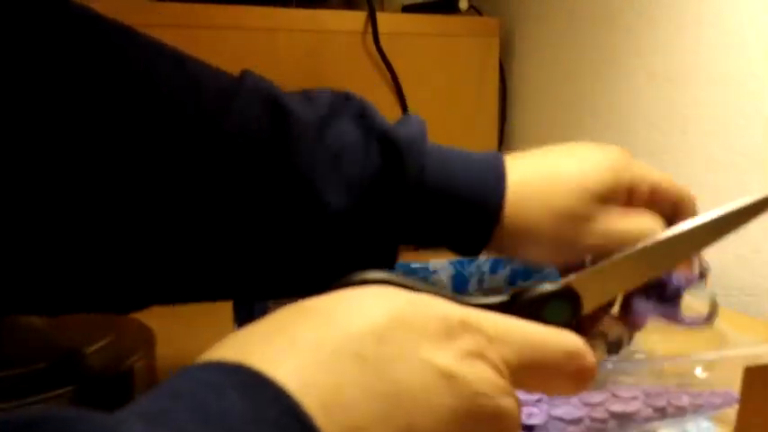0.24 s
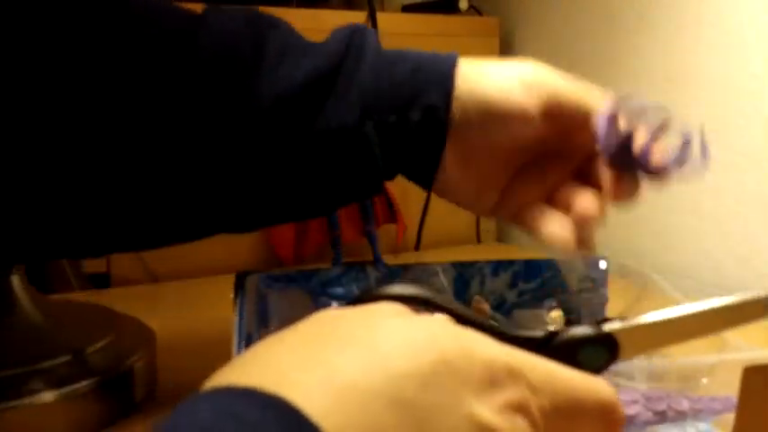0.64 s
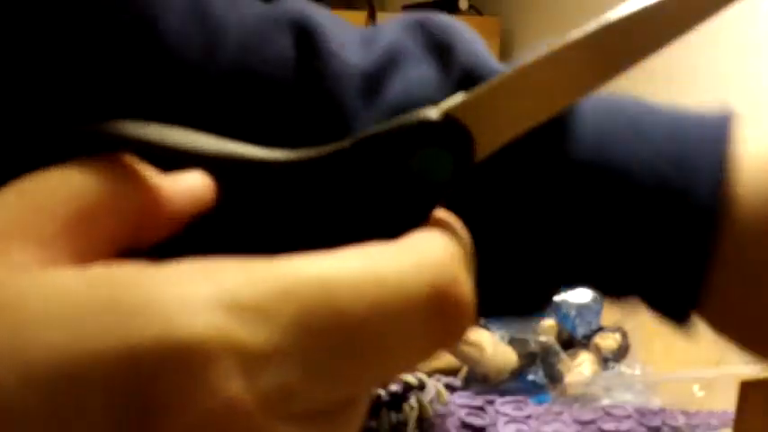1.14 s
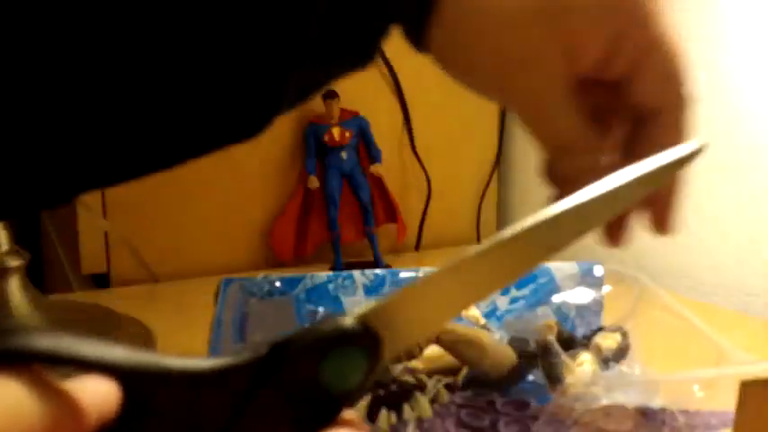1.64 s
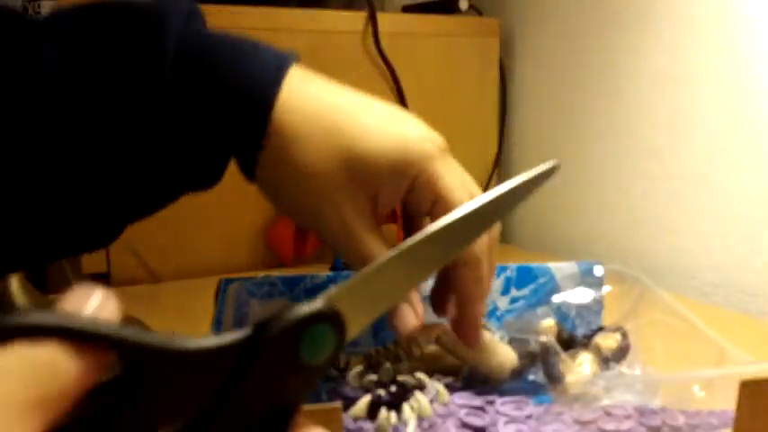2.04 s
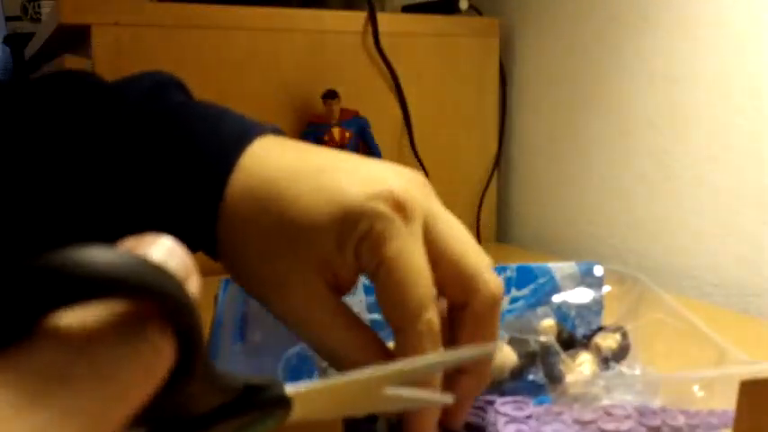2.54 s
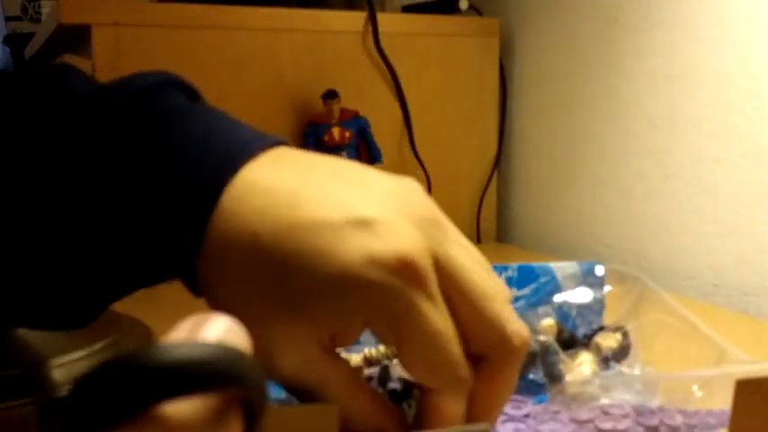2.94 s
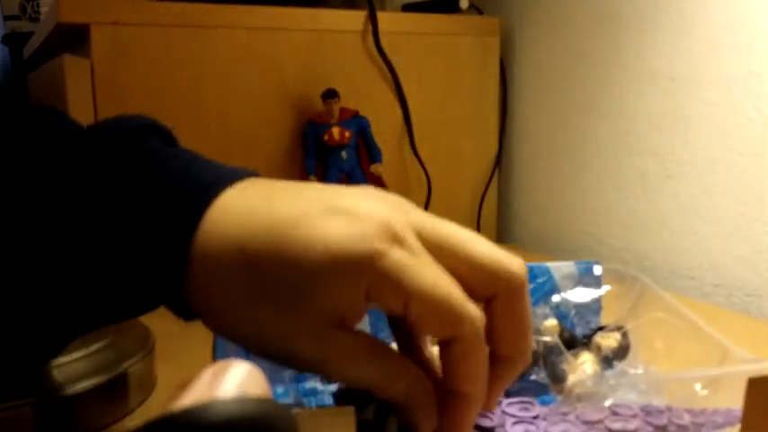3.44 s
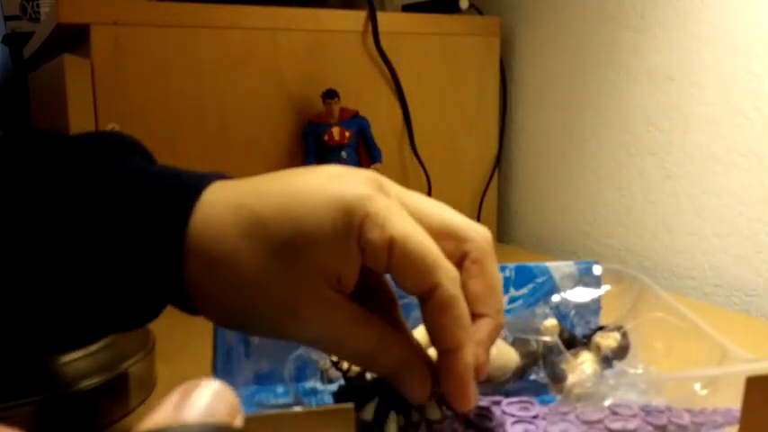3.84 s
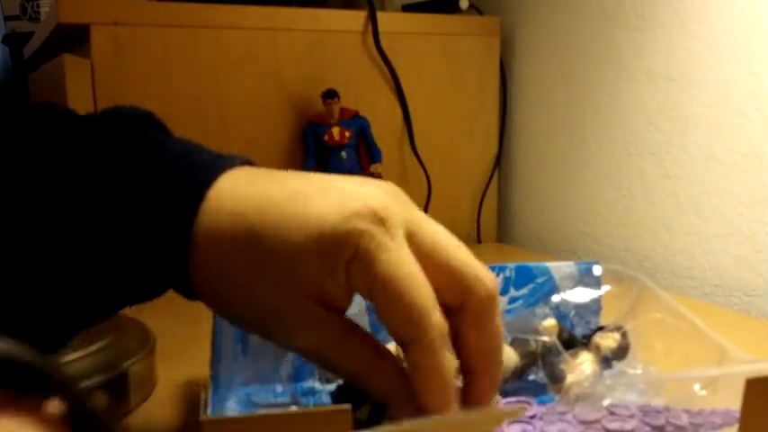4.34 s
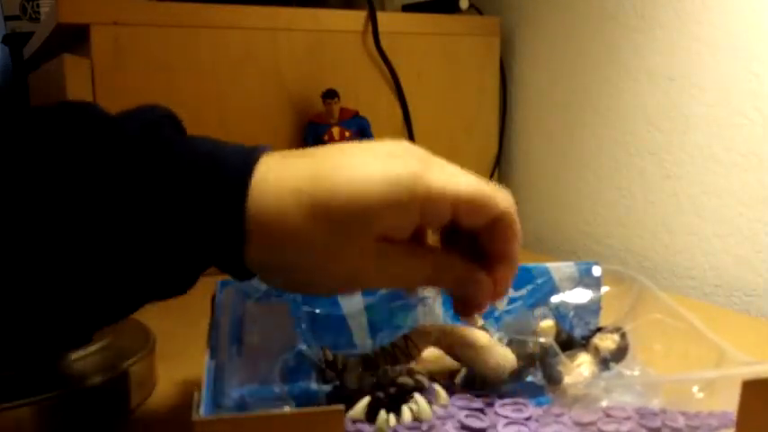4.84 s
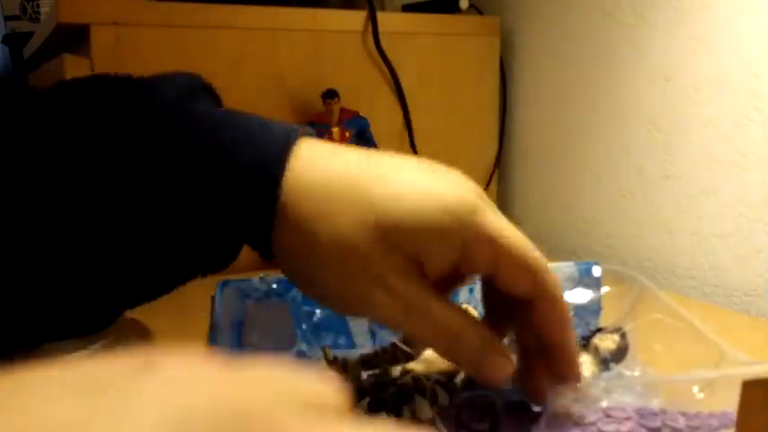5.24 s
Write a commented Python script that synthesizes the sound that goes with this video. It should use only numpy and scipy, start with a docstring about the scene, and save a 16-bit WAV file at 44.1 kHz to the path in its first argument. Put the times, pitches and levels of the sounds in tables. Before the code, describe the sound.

Close, sharp snaps and crinkles of plastic packaging being pried apart, with desk thumps and scissors sliding open, then laid down.

```python
"""Hard plastic parts are pried from a thin blister tray on a wooden desk, close up in a small quiet room.
First second: the film buckles and scrapes, parts snap and ring, tray and desk knock.
Sparser knocks and faint edge squeaks follow; at 2.2 s scissor blades slide open, steel on steel.
The prying goes on, with loud snaps at 4.0 and 4.8 s; from 4.8 s the scissors are laid down and rock.
Room tone and hiss run throughout; the microphone port rings near 9 kHz."""
import sys
import numpy as np
from scipy import signal
from scipy.fft import rfft, irfft, next_fast_len
from scipy.io import wavfile

SR = 44100
rng = np.random.default_rng(int(sys.argv[2]) if len(sys.argv) > 2 else 0)


def to_wav(sig):
    """Store sig (one row per channel, or 1-D mono) as 16-bit WAV at the path in sys.argv[1].

    Samples outside -1..1 are clipped; the rate is SR.
    """
    pcm = np.clip(np.atleast_2d(sig), -1, 1) * 32767
    pcm = np.round(pcm).astype(np.int16)
    wavfile.write(sys.argv[1], SR, pcm.T)  # frames by channels


N = 242991

# film handling curve: (time [s], crackle [dB], tray rattle [dB])
HANDLING = [(0.0, -42, -44.5), (0.12, -34, -46), (0.29, -56, -46.5), (0.46, -34.5, -59), (0.61, -58, -44.5),
            (0.81, -54, -66), (0.98, -76, -78.5), (1.29, -63.5, -77.5), (1.52, -68, -66), (2.3, -74.5, -76),
            (3.19, -65, -68.5), (3.79, -76, -72), (4.07, -67.5, -85), (4.22, -69, -88), (4.56, -67, -73),
            (4.88, -47.5, -61), (5.29, -63.5, -59.5), (5.51, -49.5, -68)]
# contacts: (time [s], snap [dB], part [dB], tray [dB], part spot [Hz], pocket [Hz], chatter t60 [s])
CONTACTS = [(0.0503, -23.5, -35.5, -30, 1920, 947, 0.06), (0.0661, -14, -20, -21.5, 2950, 1280, 0.077),
            (0.1146, -15, -36, -24.5, 1840, 751, 0.067), (0.1246, -10.5, -19.5, -20, 3500, 735, 0.06),
            (0.1776, -20.5, -32, -39, 1750, 1020, 0.05), (0.2009, -16.5, -35, -35, 1780, 751, 0.032),
            (0.2597, -3, -15, -50, 2030, 931, 0.049), (0.2654, 0, -10.5, -26, 3900, 735, 0.054),
            (0.2864, -6.5, -24, -51, 3070, 450, 0.06), (0.2944, -4.5, -33, -23, 3770, 1050, 0.076),
            (0.2998, -2, -22, -19, 3350, 764, 0.092), (0.3104, 0, -6.5, -21, 2040, 1300, 0.096),
            (0.393, -3.5, -21.5, -22.5, 4170, 710, 0.06), (0.4372, -5.5, -22.5, -8.5, 2070, 910, 0.036),
            (0.4467, -8, -17, -29, 2150, 1010, 0.06), (0.4694, -11, -20, -22.5, 1730, 950, 0.04),
            (0.4983, -18.5, -25, -21, 1860, 880, 0.047), (0.5575, -14, -25, -18.5, 1860, 790, 0.075),
            (0.6636, -13.5, -29.5, -37, 1740, 729, 0.075), (0.7123, -22.5, -40.5, -44, 3600, 1050, 0.083),
            (0.764, -26, -44, -51, 3620, 436, 0.044), (0.8081, -16, -30, -29.5, 2790, 479, 0.066),
            (0.9348, -28.5, -18, -28, 2990, 1130, 0.043), (0.9562, -16, -19.5, -30, 1913, 498, 0.022),
            (1.32, -27, -15, -22.5, 1800, 945, 0.048), (1.513, -50, -45, -38.5, 1850, 380, 0.057),
            (1.5281, -40, -49, -40.5, 1890, 383, 0.042), (1.5473, -29, -36.5, -28, 1640, 418, 0.073),
            (1.6031, -28, -43, -37.5, 1640, 423, 0.052), (1.7675, -23, -44, -46, 3780, 419, 0.06),
            (1.8433, -51, -49.5, -43, 1736, 422, 0.06), (1.8872, -46, -43.5, -42, 1755, 382, 0.063),
            (2.0108, -53.5, -68, -50.5, 1788, 428, 0.0615), (2.0562, -53.5, -61, -47, 1637, 423, 0.096),
            (2.1875, -33.5, -45, -35, 1810, 423, 0.06), (2.4892, -46, -61, -60, 1973, 425, 0.059),
            (2.528, -32, -50.5, -44.5, 1730, 474, 0.08), (2.589, -34, -58, -49.5, 2200, 1130, 0.091),
            (2.6887, -29, -42.5, -37, 1960, 937, 0.17), (2.8155, -34.5, -48, -43, 1800, 484, 0.025),
            (2.9205, -29.5, -42.5, -37.5, 1960, 1070, 0.18), (2.963, -22.5, -36.5, -33, 2870, 724, 0.11),
            (3.035, -40, -47, -39.5, 3120, 1090, 0.042), (3.053, -25.5, -39.5, -39, 2870, 1100, 0.16),
            (3.0964, -34, -36, -34.5, 1590, 1140, 0.14), (3.1111, -14, -28.5, -21.5, 1730, 1036, 0.074),
            (3.1803, -35.5, -46, -39.5, 1740, 587, 0.042), (3.22, -40, -48, -67, 2840, 474, 0.023),
            (3.3244, -41, -40, -33, 1800, 408, 0.046), (3.3687, -31.5, -48, -51.5, 2890, 654, 0.038),
            (3.3779, -25, -40.5, -39, 1920, 937, 0.065), (3.451, -17.5, -28.5, -25, 2865, 990, 0.055),
            (3.4696, -21, -35, -34, 1590, 840, 0.076), (3.5431, -40, -43, -36, 1920, 483, 0.054),
            (3.8254, -36, -53, -47.5, 2750, 466, 0.071), (3.8502, -23.5, -48, -36, 2130, 401, 0.029),
            (3.926, -28.5, -41, -49, 2910, 1140, 0.031), (3.9989, 0, -19.5, -19.5, 3000, 1080, 0.076),
            (4.0113, -11, -29.5, -25, 2405, 1050, 0.06), (4.0284, -16.5, -36, -32, 1960, 441, 0.16),
            (4.0627, -17.5, -42, -55, 2910, 463, 0.06), (4.0738, -19.5, -42, -56, 3150, 1000, 0.07),
            (4.2018, -23.5, -31.5, -30.5, 2880, 465, 0.088), (4.4477, -17.5, -35, -34, 1956, 600, 0.052),
            (4.6157, -21.5, -40.5, -44, 2830, 1130, 0.06), (4.6275, -23.5, -39.5, -30.5, 2090, 1020, 0.055),
            (4.7202, -24.5, -41, -41, 3540, 463, 0.055), (4.7329, -29, -43.5, -41.5, 1700, 460, 0.066),
            (4.7495, -20, -30, -27, 2750, 1020, 0.096), (4.775, -2.5, -18.5, -24, 3120, 527, 0.13),
            (4.785, -15, -36, -28, 1820, 460, 0.035), (4.8991, -24, -36.5, -65, 4070, 1230, 0.043),
            (4.9194, -23, -19.5, -19, 2500, 1060, 0.02), (5.0186, -43, -35, -24.5, 1850, 524, 0.065),
            (5.0774, -23.5, -38, -41, 1790, 1190, 0.066), (5.184, -18, -32.5, -31.5, 2050, 1140, 0.092),
            (5.2844, -19.5, -23, -30, 3430, 815, 0.06), (5.3206, -15.5, -46, -32, 3530, 470, 0.056),
            (5.3264, -25, -58, -48, 1930, 474, 0.06), (5.3701, -9, -19.5, -29, 1970, 1190, 0.055),
            (5.4055, -13.5, -36, -19.5, 1890, 1230, 0.066), (5.4136, -11.5, -26.5, -28, 1600, 570, 0.15),
            (5.4235, -20, -44, -21, 1940, 991, 0.032), (5.4307, -21, -31, -15, 1960, 466, 0.025),
            (5.5004, -20, -36, -39, 3790, 1070, 0.06)]
# glancing fingers and parts: (time [s], bright [dB], tray [dB])
GLANCES = [(0.0601, -12.5, -16), (0.0867, -15.5, -19), (.1605, -23.5, -23.5), (0.1919, -26, -26),
           (.6374, -36, -32.5), (.7324, -24.5, -32), (1.3048, -33, -41), (3.293, -52.5, -64.5),
           (3.5315, -46, -35.5), (3.5976, -55.5, -44), (3.7257, -66.5, -44), (3.8447, -39.5, -28.5),
           (3.9673, -22.5, -40), (3.9858, -18.5, -32), (4.1859, -33.5, -33), (4.4287, -27.5, -30),
           (4.6909, -34, -46.5), (5.3562, -27, -31), (5.406, -2.5, -18.5)]
# hand or tray on the desk: (time [s], level [dB], struck spot [Hz])
LANDINGS = [(0.066, -40, 226), (0.112, -53, 350), (0.251, -53, 135), (0.305, -47, 345), (0.438, -30, 350),
            (0.571, -62, 342), (0.804, -43.5, 293), (0.903, -38.5, 312), (0.956, -25, 223),
            (1.319, -35.5, 194), (1.522, -23, 294), (1.602, -30.5, 298), (1.769, -39.5, 200),
            (1.84, -40, 328), (1.88, -41.5, 226), (2.01, -39.5, 310), (2.056, -40.5, 304),
            (2.187, -31.5, 315), (2.488, -46, 199), (2.533, -50.5, 207), (2.69, -53.5, 304),
            (2.812, -41, 304), (2.963, -39, 331), (3.104, -45, 350), (3.179, -45.5, 324),
            (3.324, -36.5, 342), (3.452, -34.5, 312), (3.543, -49.5, 335), (3.647, -42.5, 231.3),
            (3.852, -36.5, 339), (3.998, -23, 328), (4.199, -30.5, 342), (4.427, -56.5, 250),
            (4.775, -35, 205), (4.915, -38, 190), (5.021, -25.5, 178), (5.183, -38.5, 139),
            (5.283, -31.5, 204), (5.374, -29, 190), (5.415, -23, 347)]
# parts dragged on film: (time [s], length [s], bright [dB], body [dB], tray [dB], swell [dB])
DRAGS = [(.26, .05, -11.5, -27, -31, -4), (.322, .035, -11.5, -17, -18.5, -6),
         (.41, .025, -32.5, -37, -34.5, 14), (.45, .08, -40, -48, -33.5, 1.5),
         (.57, .06, -48.5, -47.5, -33.5, -15.5), (.815, .14, -44.5, -45, -42.5, 14),
         (1.34, .13, -55, -63, -65, -13.5), (4.86, .045, -36, -47.5, -86, 10.5),
         (4.95, .05, -61, -63, -57, -0.5), (5.03, .03, -53, -56.5, -36.5, -6),
         (5.078, .04, -40.5, -53.5, -47.5, 0), (3.11, 0.0365, -46.5, -56, -48, -8.5),
         (5.3, .03, -37.5, -46.5, -42, 8.5)]
# heavier moves on the desk: (time [s], level [dB])
PUSHES = [(0.261, -42), (0.314, -38), (1.317, -21), (1.528, -34), (2.185, -45.5), (3.998, -40.5),
          (4.773, -23.5), (5.018, -20.5)]
# sliding edge: (time [s], length [s], start [Hz], end [Hz], level [dB])
EDGE_GLIDES = [(2.216, .021, 17000, 8200, -41), (3.588, .02, 10300, 11700, -62),
               (1.443, .035, 9700, 9400, -70), (1.298, .014, 8700, 9300, -64)]
# blade slide curve: (time [s], level [dB])
BLADE_SLIDE = [(2.192, -46.5), (2.204, -25.5), (2.23, -25), (2.248, -45), (2.31, -68)]
# scissors on the desk: (time [s], level [dB], struck spot [Hz])
SCISSOR_TOUCHES = [(4.777, -44, 1950), (4.917, -40, 2450), (5.021, -37, 1220), (5.079, -37, 1430),
                   (5.369, -36.5, 1195)]

# spectra: (frequency [Hz], relative density [dB])
SNAP_SPECTRUM = [(200, -74.5), (3000, -34), (5500, -25), (7000, 8.5), (12000, 7.5), (16000, 0.5)]  # film snap
BODY_SPECTRUM = [(100, -56.5), (700, -25), (1300, 1.5), (1800, 3.5), (2500, 1), (4500, -2), (6000, -7.5),
                 (9000, -58.5)]  # film body
TRAY_SPECTRUM = [(40, -70), (100, -39.5), (250, -16.5), (450, 11), (650, 2), (900, 9), (1250, 3.5),
                 (1600, -20.5), (3000, -49)]  # hollow tray
DULL_SPECTRUM = [(100, -59), (700, -28.5), (1500, -3), (2200, -2), (3200, -6.5), (4500, -17.5), (7000, -40)]  # soft contact
AIR_SPECTRUM = [(18, -55.5), (30, -31), (123, 10), (300, 5.5), (711, -16), (2430, -12.5), (3330, -15.5),
                (3900, -16.5), (5480, -24.5), (7900, -18), (9000, -1.5), (10500, -11.5), (15600, -16)]  # room tone and microphone hiss

# modes: (frequency [Hz], relative level [dB], t60 before added damping [s])
PART_MODES = [(1760, 1, .06), (2022, 2.5, 0.05), (2315, -14, .05), (2935, 2, 0.079), (3570, 1.5, .04),
              (4540, -3, 0.09)]  # hollow parts
TRAY_MODES = [(415, -1.5, .12), (474, -3.5, 0.25), (510, -3, 0.3), (717.4, 4, 0.051), (845, -8, 0.043),
              (950, 11.5, 0.09), (1057, 15.5, 0.068), (1190, 2.5, .14), (1300, -5, 0.32)]  # tray pockets
DESK_MODES = [(140.4, -1.5, 0.33), (216, 2.5, 0.15), (250, 0.5, 0.038), (307, 3.5, 0.058)]  # desk top
SCISSOR_MODES = [(1080, -8.5, 0.1), (1183, 3.5, 0.21), (1664, -19.5, 0.094), (1820, -11.5, 0.33),
                 (2116, -10.5, 0.38), (2401, -9, 0.15), (2920, -20.5, 0.34)]  # loose scissors

# resonances: (frequency [Hz], width [Hz], gain [dB])
BLADE_PEAKS = [(2164, 140, -6.5), (3740, 77, -1.5), (4740, 240, -12.5), (5444, 170, -13), (7540, 180, -4.5),
               (8800, 310, -10), (10620, 350, -2), (12000, 350, -2.5), (13000, 500, -4.5),
               (15000, 1200, -13)]  # sliding blades
PORT_PEAK = (9146, 703, 23.4)  # microphone port
# room decay: (frequency [Hz], t60 [s])
ROOM_DECAY = [(200, 0.23), (2000, 0.14), (10000, 0.037)]


def amp(db):
    """Decibels to gain."""
    return 10 ** (np.asarray(db) / 20)


def rise(t, tau_s):
    """Exponential attack."""
    return 1 - np.exp(-t / tau_s)


def decay(t, t60_s):
    """Falls 60 dB per t60_s."""
    return amp(-60 * t / t60_s)


def span(start_s, count):
    """Slice of count samples from start_s."""
    return slice(round(start_s * SR), round(start_s * SR) + count)


def unit(x):
    """Scaled to rms 1."""
    return x / np.sqrt(np.mean(x ** 2) + 1e-20)


def along(points, hz):
    """(frequency [Hz], value) points read on a log axis."""
    f, v = np.transpose(points)
    return np.interp(np.log(hz + 1), np.log(f + 1), v)


def gains(rows):
    """Gain per sample for each dB column; silent outside the curve."""
    times_s, *columns_db = np.transpose(rows)
    return amp([np.interp(np.arange(N) / SR, times_s, db, -120, -120) for db in columns_db])


def filtered(x, response):
    """x through a complex frequency response."""
    size = next_fast_len(len(x) + 8192)
    return irfft(rfft(x, size) * response(np.fft.rfftfreq(size, 1 / SR)), size)[:len(x)]


def coloured(x, spectrum):
    """x shaped by a spectrum, rms 1."""
    return unit(filtered(x, lambda hz: amp(along(spectrum, hz))))


def peak(f, hz, width_hz):
    """One causal resonance."""
    return 1j * f * width_hz / (hz * hz - f * f + 1j * f * width_hz)


def resonated(x, peaks):
    """x through parallel resonances of alternating sign."""
    return filtered(x, lambda f: sum((-1) ** k * amp(db) * peak(f, hz, width_hz)
                                     for k, (hz, width_hz, db) in enumerate(peaks)))


def port(f, low_cut_hz=80):
    """The microphone cuts deep bass; the air in its port lifts one band."""
    hz, width_hz, db = PORT_PEAK
    return (1 + amp(db) * peak(f, hz, width_hz)) * (1j * f / (low_cut_hz + 1j * f)) ** 2


def unit_at_mic(x):
    """Scaled to reach rms 1 behind the port."""
    return x / np.std(filtered(x, port))


def grit(rate_hz, spread_db, life_s, count=N):
    """Slips and buckles: tiny noise bursts of unequal size."""
    onsets = rng.random(count) < rate_hz / SR
    sizes = amp(spread_db * np.minimum(rng.exponential(size=count), 2.2))
    bursts = signal.lfilter([1], [1, -np.exp(-1 / (life_s * SR))], onsets * sizes)
    return bursts * rng.standard_normal(count)


def rubbed(x, modes, widen=1):
    """Modes driven by x, rms 1; touch can widen them."""
    peaks = [(hz, widen * np.log(1000) / (np.pi * t60_s), db) for hz, db, t60_s in modes]
    return unit(resonated(x, peaks))


def struck(modes, t, spot_hz, damping_t60_s, focus_db_oct, scatter_db, detune, attack_s):
    """Damped modes, weaker away from spot_hz; strength and pitch vary per blow."""
    hz, db, t60_s = np.transpose(modes)[..., None]
    db = db - focus_db_oct * np.abs(np.log2(hz / spot_hz))
    level_draw, pitch_draw = rng.standard_normal((2, len(modes), 1))
    tones = np.sin(2 * np.pi * hz * (1 + detune * pitch_draw) * t)
    ring = np.sum(amp(db + scatter_db * level_draw) * decay(t, t60_s) * tones, axis=0)
    nominal_rms = np.sqrt(np.sum(amp(db) ** 2) / 2)
    return rise(t, attack_s) * decay(t, damping_t60_s) * ring / nominal_rms


def film(bright_gain, body_gain, tray_gain, buckles, part_gain):
    """One stream of buckles excites film skin, film body, parts and tray."""
    skin = unit_at_mic(coloured(buckles, SNAP_SPECTRUM))
    body = unit(coloured(buckles, BODY_SPECTRUM) + part_gain * rubbed(buckles, PART_MODES))
    return bright_gain * skin + body_gain * body + tray_gain * coloured(buckles, TRAY_SPECTRUM)


def rustle(body_db=-7.5):
    """Handled film crackles in coarse bursts."""
    bright, tray = gains(HANDLING)
    buckles = grit(rate_hz=280, spread_db=3, life_s=0.0058)
    return film(bright, amp(body_db) * bright, tray, buckles, part_gain=0.4)


def clicks(chatter_gain=0.22, settle_db=-19, settle_t60_s=0.067):
    """Each contact cracks, chatters on, rings the part and knocks the tray."""
    t, out = np.arange(SR // 4) / SR, np.zeros(N + SR)
    spectra = (SNAP_SPECTRUM, BODY_SPECTRUM, DULL_SPECTRUM, TRAY_SPECTRUM)
    cracks = np.array([unit_at_mic(coloured(rng.standard_normal(N + SR), s)) for s in spectra])
    touches = grit(rate_hz=1100, spread_db=4.5, life_s=0.0014, count=N + SR)
    chatter = np.array([unit_at_mic(coloured(touches, s)) for s in spectra])
    crack_shape = 0.92 * rise(t, 0.00075) * decay(t, 0.011)
    for start_s, snap_db, part_db, tray_db, part_hz, pocket_hz, t60_s in CONTACTS:
        at = span(start_s, len(t))
        onset_rms = cracks[:, at][:, :SR // 250].std(axis=1, keepdims=True)
        crack = cracks[:, at] * cracks.std(axis=1, keepdims=True) / onset_rms  # full-strength onset
        settling = amp(settle_db) * decay(t, settle_t60_s)
        chatter_shape = chatter_gain * rise(t, 0.0022) * (decay(t, t60_s) + settling)
        snap, body, dull, hollow = crack_shape * crack + chatter_shape * chatter[:, at]
        part = struck(PART_MODES, t, part_hz, damping_t60_s=2.2 * t60_s,
                      focus_db_oct=12, scatter_db=1.5, detune=0.038, attack_s=0.0005)
        tray = struck(TRAY_MODES, t, pocket_hz, damping_t60_s=3.5 * t60_s,
                      focus_db_oct=19, scatter_db=4.5, detune=0.037, attack_s=0.00068)
        # hard edge: bright snap; soft contact: dull, more ring
        hardness = np.clip((snap_db - part_db + 7.5) / 18, 0, 1)
        contact = hardness * body + 0.31 * (1 - hardness) * dull
        out[at] += amp(snap_db) * snap
        out[at] += amp(part_db) * ((0.65 - 0.11 * hardness) * part + 1.78 * contact)
        out[at] += amp(tray_db) * ((0.65 - 0.23 * hardness) * tray + (1.1 + 0.67 * hardness) * hollow)
    return out[:N]


def brushes(body_offset_db=-2):
    """A glancing touch swells and fades as fine grit, without a crack."""
    t, out = np.arange(SR // 4) / SR, np.zeros(N + SR)
    touches = grit(rate_hz=2400, spread_db=2, life_s=0.0015, count=N + SR)
    spectra = (SNAP_SPECTRUM, BODY_SPECTRUM, TRAY_SPECTRUM)
    layers = np.array([unit_at_mic(coloured(touches, s)) for s in spectra])
    shape = rise(t, 0.0064) ** 2 * decay(t, 0.052)
    for start_s, bright_db, tray_db in GLANCES:
        at = span(start_s, len(t))
        body_db = (bright_db + tray_db) / 2 + body_offset_db
        out[at] += shape * (amp([bright_db, body_db, tray_db]) @ layers[:, at])
    return out[:N]


def thuds():
    """Each landing strikes the desk's modes and briefly rubs them."""
    t, out = np.arange(SR // 4) / SR, np.zeros(N + SR)
    rub = rubbed(rng.standard_normal(N + SR), DESK_MODES, widen=3)
    rub_shape = 0.4 * rise(t, 0.0035) * decay(t, 0.16)
    for start_s, db, spot_hz in LANDINGS:
        at = span(start_s, len(t))
        boom = struck(DESK_MODES, t, spot_hz, damping_t60_s=0.39,
                      focus_db_oct=31.5, scatter_db=2.5, detune=0.02, attack_s=0.0034)
        out[at] += amp(db) * (rub_shape * rub[at] + boom)
    return out[:N]


def scrapes(grab_s=0.0021, release_t60_s=0.12):
    """Parts dragged on the film hiss and sing: grab, swell or fade, release."""
    t, levels = np.arange(N) / SR, np.zeros((3, N))
    for start_s, length_s, *layers_db, swell_db in DRAGS:
        age_s = t - start_s
        stroke_db = swell_db * (np.clip(age_s / length_s, 0, 1) - 0.5)
        release = decay(np.maximum(age_s - length_s, 0), release_t60_s)
        levels += np.outer(amp(layers_db), np.clip(age_s / grab_s, 0, 1) * amp(stroke_db) * release)
    return film(*levels, grit(rate_hz=1500, spread_db=1.5, life_s=0.00077), part_gain=0.36)


def jolts(push_s=0.0035):
    """The desk jolts: one low push and its rebound."""
    u, out = np.arange(SR // 10) / SR / push_s, np.zeros(N + SR)
    for start_s, db in PUSHES:
        out[span(start_s, len(u))] += amp(db) * u * (1 - u / 2) * np.exp(-u)
    return out[:N]


def squeaks():
    """A sliding edge whistles; each glide is fastest at its start."""
    out = np.zeros(N)
    for start_s, length_s, from_hz, to_hz, db in EDGE_GLIDES:
        progress = np.linspace(0, 1, round(length_s * SR))
        hz = to_hz + (from_hz - to_hz) * (1 - progress) ** 1.8
        shape = np.sin(np.pi * progress) ** 0.49
        out[span(start_s, len(hz))] += amp(db) * shape * np.sin(2 * np.pi * np.cumsum(hz) / SR)
    return out


def scissors_open():
    """Steel slides on steel: fine grit through the blade resonances."""
    friction = grit(rate_hz=6000, spread_db=2, life_s=0.001)
    return gains(BLADE_SLIDE)[0] * unit_at_mic(resonated(friction, BLADE_PEAKS))


def scissors_laid_down():
    """The scissors rock on the desk; each touch rings the steel."""
    t, out = np.arange(SR // 3) / SR, np.zeros(N + SR)
    for start_s, db, spot_hz in SCISSOR_TOUCHES:
        ring = struck(SCISSOR_MODES, t, spot_hz, damping_t60_s=1.23,
                      focus_db_oct=9.5, scatter_db=2, detune=0.00255, attack_s=0.00075)
        out[span(start_s, len(t))] += amp(db) * ring
    return out[:N]


def room(x, delay_samples=130):
    """Reverberation, treble dying first; a new noise tail every quarter second."""
    out, step = np.zeros(N + 2 * SR), SR // 4
    for at in range(0, N, step):
        hz, t, noise = signal.stft(rng.standard_normal(SR // 2), SR, nperseg=256)
        tail = signal.istft(noise * decay(t, along(ROOM_DECAY, hz)[:, None]), SR, nperseg=256)[1]
        wet = signal.fftconvolve(x[at:at + step], tail / np.linalg.norm(tail))
        out[at + delay_samples:][:len(wet)] += wet
    return out[:N]


def scene():
    """Hands, tray and scissors in the room."""
    room_db = -12.5
    near = clicks() + thuds() + brushes() + jolts() + rustle() + scrapes()
    near += scissors_open() + scissors_laid_down() + squeaks()
    return (near + amp(room_db) * room(near))[None]


def record(dry):
    """Port colour, room tone and hiss, fast limiter on the loudest snaps, band limit."""
    air_db, ceiling, top_hz = -64.5, 0.78, 15750
    x = filtered(dry[0], port) + amp(air_db) * coloured(rng.standard_normal(N), AIR_SPECTRUM)
    envelope = np.abs(signal.hilbert(x, next_fast_len(N)))[:N]
    limited = x / (1 + (envelope / ceiling) ** 6) ** (1 / 6)
    return filtered(limited, lambda f: f < top_hz)[None]


dry = scene()
out = record(dry)
to_wav(out)
```